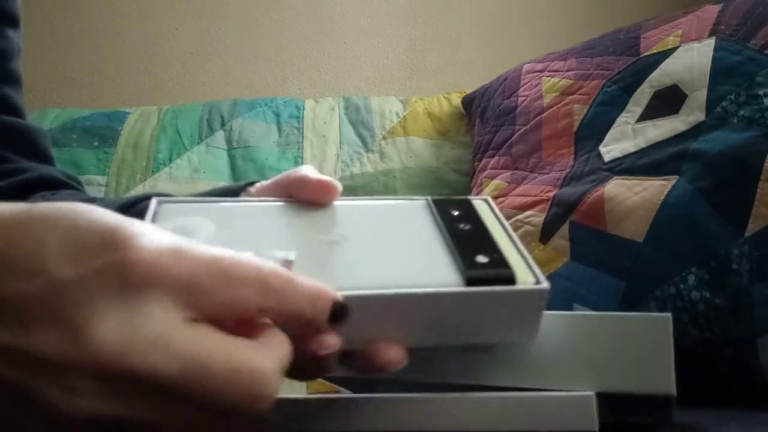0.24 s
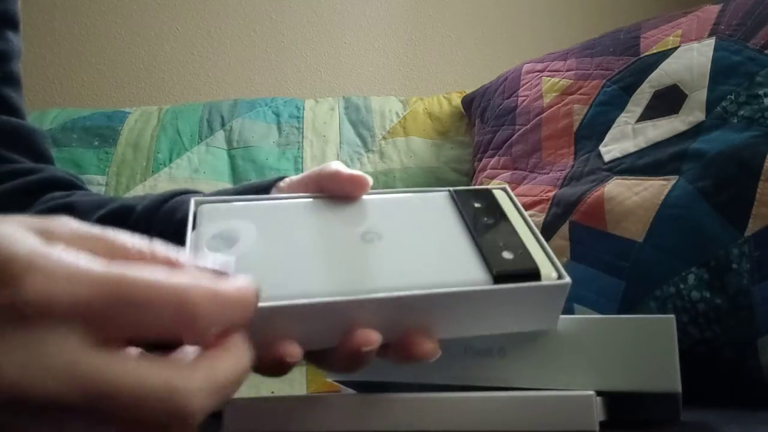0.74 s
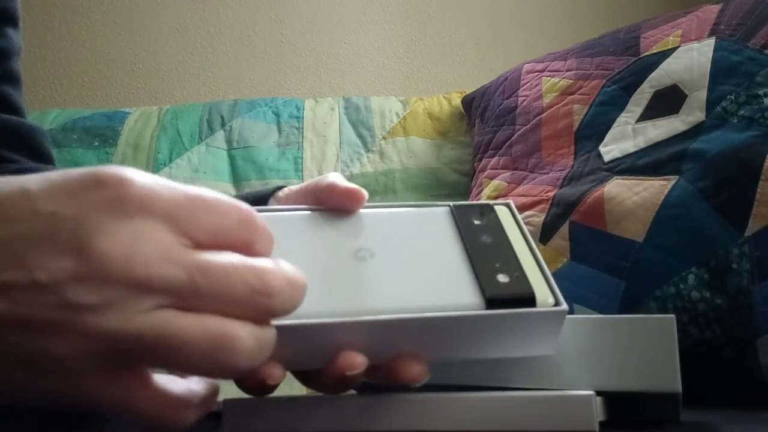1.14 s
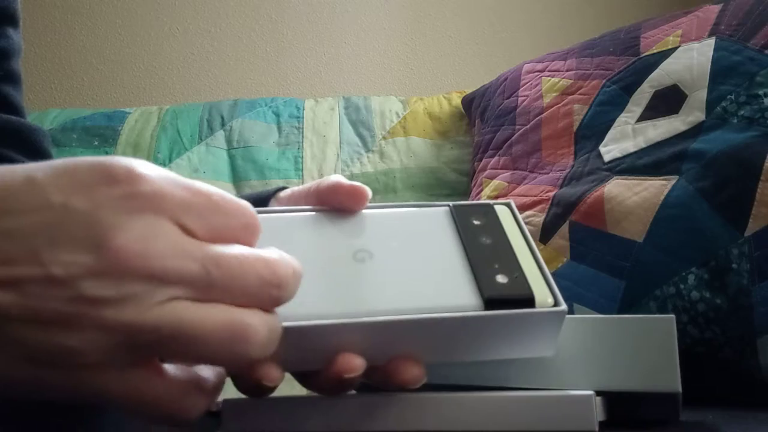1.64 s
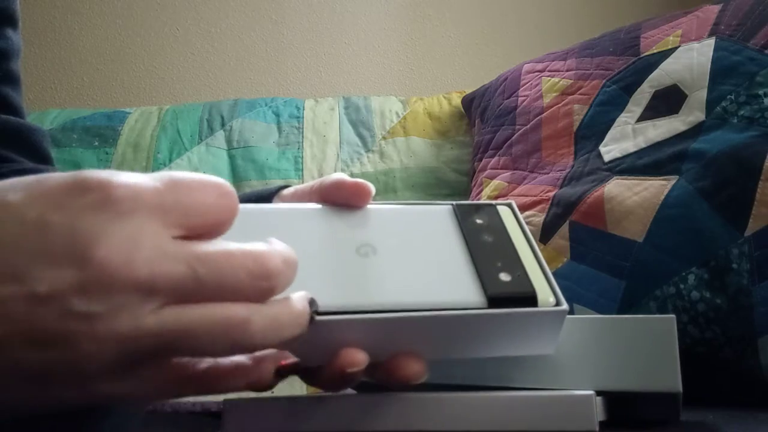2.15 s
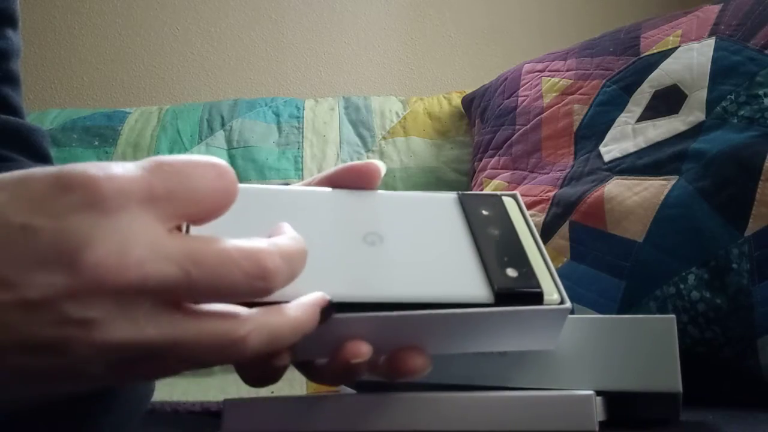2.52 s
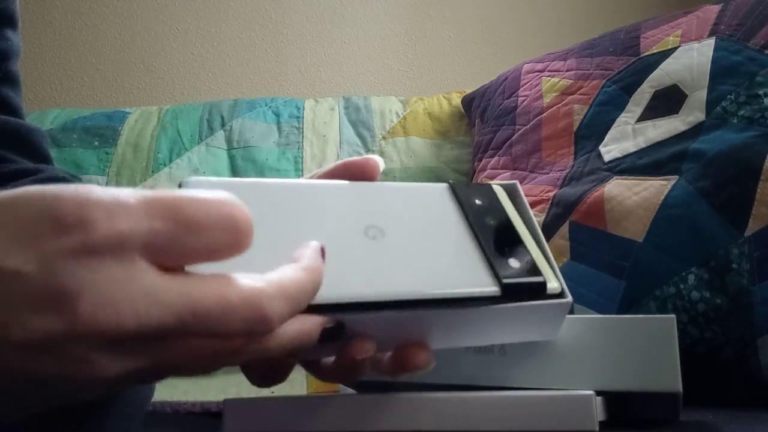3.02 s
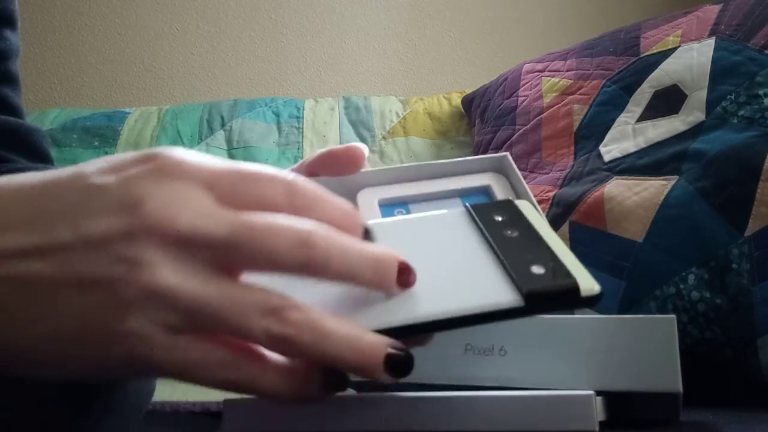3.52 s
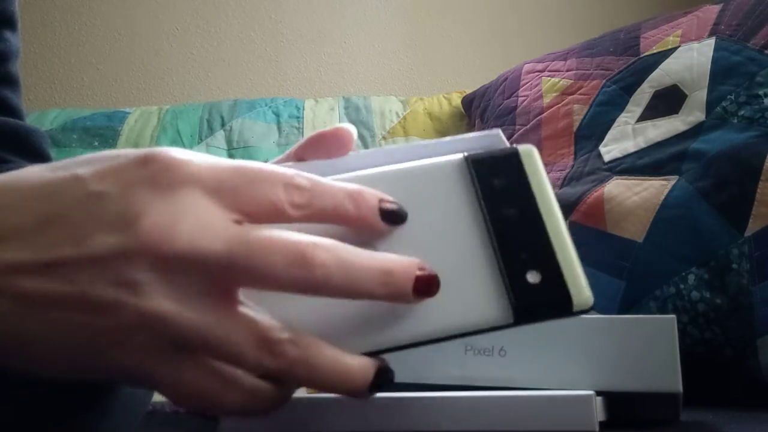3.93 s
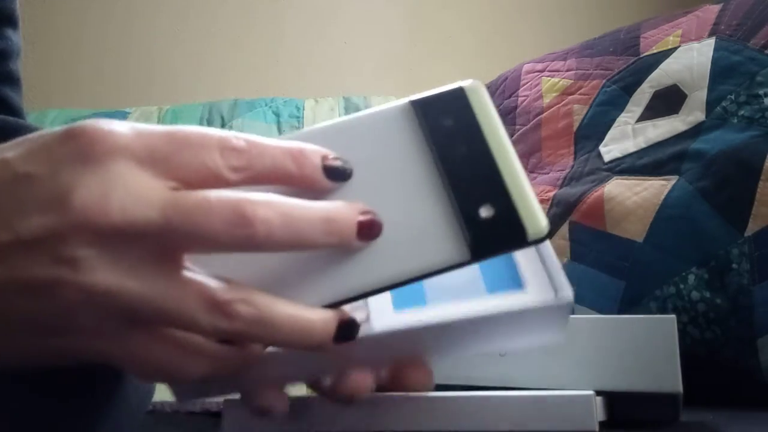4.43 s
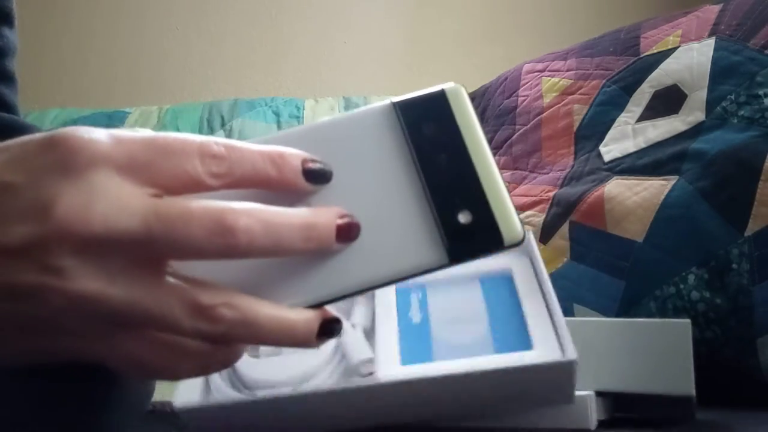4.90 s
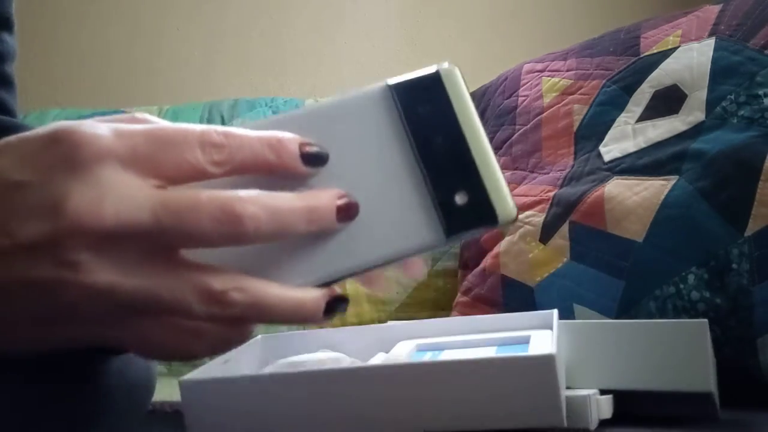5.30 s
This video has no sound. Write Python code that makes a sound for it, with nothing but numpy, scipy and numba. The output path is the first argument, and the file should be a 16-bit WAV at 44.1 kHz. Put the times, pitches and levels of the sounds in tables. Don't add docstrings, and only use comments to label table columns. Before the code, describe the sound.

A quiet, cushioned room with faint hiss, low hum and hardly any reverberation; handling is very close, stronger in the left channel. From 0 to 0.6 s fingers rub a small hollow cardboard box, with papery hiss, nail taps around 0.2 s and soft drumming thuds. From 0.65 to 2 s it is nearly quiet, with tiny creeps and faint flicks. From 2 to 2.9 s short, smooth, woody scuffs and light taps come and go. At 3.1 s a sharp loud click, then a rough drag at 3.2-3.45 s with rattling knocks, hardest near 3.4 s, as the phone comes free. Light brushes follow; at 4 s a very short, rubbery squeak. Quiet until 4.7 s, then a faint wavering creak, bright little ticks near 4.9 s, and a clicking, scuffing landing at 4.97 s. Soft rubbing fades, then a cluster of crisp ticks and hollow thumps at 5.3-5.36 s, a smooth slide, and stillness by 5.5 s.

```python
import sys
import numpy as np
from scipy import signal
from scipy.fft import rfft, irfft
from scipy.io import wavfile
from scipy.ndimage import uniform_filter1d
from numba import njit

SR = 44100
rng = np.random.default_rng(int(sys.argv[2]) if len(sys.argv) > 2 else 0)


def volts(x):
    e = np.asarray(x, float) / 20
    return 10 ** e


def unload_wav(signal):
    wavfile.write(
        sys.argv[1],
        SR,
        np.round(np.clip(np.atleast_2d(signal).T, -1, 1) * 32767).astype(np.int16),
    )


N = 245195
HZ = np.arange(N // 2 + 1) * SR / N
TIME = np.arange(N) / SR
QUIET_TOP_HZ = 15900


def unit(x):
    return x / np.sqrt(np.mean(x ** 2))


def over_hz(table):
    hz, value = np.transpose(table)
    return np.interp(np.log(HZ + 1), np.log(hz + 1), value)


def over_time(table):
    s, *columns = np.transpose(table)
    return [np.interp(TIME, s, column) for column in columns]


@njit
def svf(x, hz, q):
    y, band, low = np.empty(len(x)), 0., 0.
    for i in range(len(x)):
        g = np.tan(np.pi * hz[i] / SR)
        v = (band + g * (x[i] - low)) / (1 + g * (g + 1 / q))
        band, low = 2 * v - band, low + 2 * g * v
        y[i] = v / q
    return y


def resonate(x, modes):
    power = 0
    for hz, width, db in modes:
        detuning = (HZ - hz ** 2 / (HZ + 1)) / width
        power = power + volts(db) ** 2 / (1 + detuning ** 2) ** 2
    return unit(irfft(rfft(x) * np.sqrt(power) * (HZ < QUIET_TOP_HZ), N))


def walk(rate):
    k = int(SR / rate)
    held = np.repeat(rng.standard_normal(N // k + 1), k)
    return unit(uniform_filter1d(held, k)[:N])


def fibres(rate, scatter_db, flutter_db, smooth):
    size = volts(np.minimum(scatter_db * rng.exponential(1, N), 13))
    clicks = (rng.random(N) < rate / SR) * size * rng.standard_normal(N)
    return (unit(clicks) + smooth * rng.standard_normal(N)) * volts(flutter_db * walk(60))


def ring(t, hz, t60, phase=0):
    return np.sin(2 * np.pi * hz * t + phase) * np.exp(-np.log(1000) * t / max(t60, .001))


def add(track, s, sound):
    i = int(s * SR)
    track[i:i + len(sound)] += sound[:N - i]


def tone(table, db):
    # f/Hz, correlation [0-1]
    likeness = [(25, .97), (60, .9), (130, .55), (290, .2), (640, 0), (1400, .4), (3000, 0)]
    # f/Hz, left minus right level/dB
    balance = [(60, 2.5), (110, -9), (200, -1), (380, 1.5), (700, 5), (1290, 6.5), (2380, 4.5), (4400, 6.5),
               (8120, 10.5), (15000, 14)]
    alike, lean = over_hz(likeness), over_hz(balance)
    mid, side = rfft(rng.standard_normal((2, N)))
    pair = np.array([np.sqrt(1 + alike) * mid + s * np.sqrt(1 - alike) * side for s in (1, -1)])
    colour = volts(over_hz(table) + np.array([lean, -lean]) / 2)
    noise = irfft(pair * colour * (HZ < QUIET_TOP_HZ), N)
    return noise / np.sqrt(np.mean(noise.mean(axis=0) ** 2)) * volts(db)


def air():
    # f/Hz, density level/dB per Hz
    room_tone = [(12, -0.5), (30, -15.5), (64, -11.5), (90, -20), (120, -18), (200, -19), (350, -19),
                 (600, -25.5), (1000, -29), (1500, -35.5), (2400, -46), (4000, -79)]
    # f/Hz, density level/dB per Hz
    mic_hiss = [(1060, -40), (1800, -7.5), (2410, -1), (2620, -5.5), (3050, -1.5), (4050, -1.5), (5040, -6),
                (5520, -1.5), (7880, -8), (8320, -8.5), (9810, -8), (14300, -9), (15900, -9)]
    # f/Hz, level/dB
    hums = [(59.5, -72.5), (119, -83.5), (200, -72), (276, -80.5)]
    hum = np.zeros(N)
    for hz, db in hums:
        level = volts(db + 2.5 * walk(7))
        hum += level * np.sin(2 * np.pi * np.cumsum(hz + 1.5 * walk(6)) / SR)
    return tone(room_tone, -64.5) + tone(mic_hiss, -81.5) + hum


def layers(rub_db, dry_db, scratch_db, gloss_db):
    scratch_share = 0.76
    over_rub = np.array([0 * dry_db, scratch_db + scratch_share * dry_db, dry_db, dry_db + gloss_db])
    return volts(rub_db + over_rub) ** 2


def contact():
    # t/s, pressure as rub level/dB, dryness as hiss over rub level/dB
    hand_leaves = [
        (0, -74.5, -3),
        (0.07, -68.5, -5),
        (0.12, -60.5, -8),
        (0.16, -59.5, -10),
        (0.22, -54, -13),
        (0.27, -62, -8.5),
        (0.35, -66.5, -3),
        (0.4, -66.5, -5.5),
        (0.43, -65, -14),
    ]
    hand_returns = [
        (0.43, -69.5, -9),
        (0.49, -61, -15),
        (0.54, -61, -11),
        (0.6, -63.5, -11),
        (0.625, -70, -15),
    ]
    slab_lifts = [
        (3.112, -61.5, -17),
        (3.19, -58, -15.5),
        (3.222, -54.5, -6.5),
        (3.265, -47.5, -5),
        (3.3, -54, -6),
        (3.35, -59, -4.5),
        (3.395, -50, -2),
        (3.425, -46, -9.5),
        (3.458, -74, -2),
    ]
    box_lowers = [
        (4.63, -83, -14),
        (4.7, -69, -4.5),
        (4.84, -67.5, -1.5),
        (4.9, -62.5, -4),
        (4.945, -60, -7),
        (4.96, -54, 2),
        (5.0, -54.5, -5),
        (5.03, -63, 1),
        (5.08, -66, -1),
    ]
    box_settles = [
        (5.08, -65, -1.5),
        (5.16, -68, -5),
        (5.25, -66, -9.5),
        (5.32, -61.5, -5.5),
        (5.365, -52.5, -16),
        (5.41, -56, -25),
        (5.45, -93, 1),
        (5.5, -82, -10.5),
    ]
    # t/s, length/s, rub level/dB, dryness level/dB, contact f/Hz
    scuffs = [(0.752, 0.067, -69, -13, 1200), (1.32, 0.094, -78, -32, 1010), (1.46, 0.035, -72, -16, 1010),
              (1.645, 0.051, -73.5, -21, 1650), (1.794, 0.035, -71, -30, 1660), (1.8, 0.082, -66, -10, 796),
              (1.86, 0.064, -76, -4, 1630), (2.082, 0.043, -64, -12.5, 1000),
              (2.109, 0.064, -58, -21, 1010), (2.181, 0.056, -65.5, -26, 1000),
              (2.243, 0.055, -56.5, -27, 1035), (2.294, 0.11, -66.5, -33, 1100),
              (2.4, 0.023, -71, -27, 1100), (2.502, 0.055, -58.5, -28, 1155), (2.557, 0.05, -63, -40, 1100),
              (2.652, 0.037, -80, -40, 1300), (2.745, 0.099, -63.5, -16.5, 1300),
              (2.823, 0.08, -61, -16, 1245), (2.957, 0.086, -71, 1.5, 1500), (3.542, 0.042, -76, -9, 1203),
              (3.616, 0.031, -77, -13, 1200), (3.759, 0.1, -70.5, -9.5, 1510),
              (3.983, 0.049, -53.5, -10.5, 990), (4.04, 0.064, -83, -6, 1300)]
    # t/s, length/s, rub level/dB, dryness level/dB
    creeps = [
        (0.651, 0.06, -74.5, -5),
        (0.858, 0.094, -70, -15),
        (1.073, 0.025, -75.5, -19),
        (1.124, 0.037, -73, -22),
    ]
    # course, contact f/Hz, scratch level/dB, gloss against paper hiss level/dB
    slides = [
        (hand_leaves, 1250, 0.8, -8),
        (hand_returns, 1300, 2.1, -6),
        (slab_lifts, 1400, -2.5, -14),
        (box_lowers, 890, 0.207, -2.5),
        (box_settles, 1000, 2, -7.5),
    ]
    power, hz = np.zeros((4, N)), np.full(N, 1200.)
    for course, slide_hz, scratch_db, gloss_db in slides:
        moving = (TIME >= course[0][0]) & (TIME < course[-1][0])
        power += moving * layers(*over_time(course), scratch_db, gloss_db)
        hz[moving] = slide_hz
    creep_hz = 2460
    short_slides = [tuple(e) for e in scuffs] + [tuple(e) + (creep_hz,) for e in creeps]
    for s, length, rub_db, dry_db, scuff_hz in short_slides:
        i, n = int((s - .012) * SR), int((length + 0.028) * SR)
        swell = signal.windows.tukey(n, .75) ** 2
        power[:, i:i + n] += layers(rub_db, dry_db, -0.5, -12)[:, None] * swell
        hz[i:i + n] = scuff_hz
    return np.sqrt(power), uniform_filter1d(hz, size=300)


def rubbing(gain, hz):
    # f/Hz, width/Hz, level/dB
    board_modes = [(570, 190, -5), (870, 400, -3), (1100, 310, -2.5), (1460, 660, -4.5), (2100, 280, -13)]
    scratch_modes = [(2500, 860, -1), (3200, 1000, -0.5), (4080, 1100, -3)]
    paper_modes = [(5650, 820, 3.5), (7540, 920, 0.5), (9650, 1200, -2.5)]
    gloss_modes = [(11770, 1600, 1), (14500, 1600, 0)]
    drag = fibres(1200, 1.4, 2.2, 1.29)
    hz = hz * (1 + .035 * walk(25))
    spot = svf(svf(drag, hz, 4.7), hz, 4.7)
    rub = unit(resonate(drag, board_modes) + volts(-7.0) * unit(spot))
    scratch = resonate(1.5 * drag + fibres(1200, 2.5, 1.7, 1.0), scratch_modes)
    ridge_hz = np.minimum(2.95 * hz, 4300) * (1 + .05 * walk(14))
    scratch = unit(scratch + 0.35 * svf(scratch, ridge_hz, 5.))
    nap = fibres(2500, 2.2, 2.0, 1.5)
    paper = np.zeros(N)
    for f, width, db in paper_modes:
        patches = volts(db + 2.3 * walk(18))
        paper += patches * resonate(nap, [(f, width, 0)])
    gloss = resonate(nap, gloss_modes)
    return gain[0] * rub + gain[1] * scratch + gain[2] * unit(paper) + gain[3] * gloss


def drumming(rub_gain):
    share, lag_s, rest_db, drum_db = 0.7, 0.17, -71, -64.5
    load = uniform_filter1d((rub_gain / volts(-58.5)) ** share, int(lag_s * SR))
    box_modes = [(120, 112, 9.5), (287, 200, -3.0), (358, 170, 0.0)]
    drum = resonate(fibres(200, 3.5, 2.7, 0.51), box_modes)
    return np.hypot(volts(rest_db), volts(drum_db) * load) * drum


def seat_jolts():
    # t/s, half length/s, level/dB
    shifts = [
        (0.0, 0.076, -59),
        (0.29, 0.073, -50.5),
        (3.45, 0.14, -67.5),
        (5.05, 0.11, -50.5),
        (5.4, 0.041, -43),
    ]
    jolt = resonate(rng.standard_normal(N), [(26.03, 26, 0)])
    shoves = sum(volts(db) * np.exp(-((TIME - s) / half) ** 2) for s, half, db in shifts)
    return (volts(-74) + shoves) * jolt


def strike(events, body_db, t60):
    # f/Hz, level/dB, t60/s
    body_modes = [(124, -4, 0.056), (286.3, 2, 0.04), (359, -4.5, 0.055), (581, -7.5, 0.054),
                  (861, 1.5, .03)]
    out, t = np.zeros(N), np.arange(4000) / SR
    edge = t[:30]
    crack_ring = np.hanning(len(edge)) * np.sin(2 * np.pi * 2300 * edge)
    for s, db, hz, crack_db in events:
        c = rng.standard_normal(216)
        knock = ring(t, hz, t60)
        knock += .5 * ring(t, hz * (1.33 + 0.16 * c[0]), 0.83 * t60)
        knock += 0.077 * ring(t, hz * (.7 + 0.036 * c[1]), 1.36 * t60)
        knock *= np.minimum(t * hz / 0.72, 1) ** 2
        body = np.zeros(len(t))
        for k, (f, g, decay) in enumerate(body_modes):
            body += volts(g + 2.2 * c[2 + k]) * ring(t, f * (1 + 0.053 * c[8 + k]), decay)
        body *= 1 - np.exp(-t / 0.0041)
        splits = (0.55 * c[16:] + (t[:200] == 0) * 4) * np.exp(-t[:200] / 0.0009)
        crack = np.convolve(splits, crack_ring)
        add(out, s + 0.000786, volts(db) * (knock / np.abs(knock).max() + volts(body_db + 2.5) * body))
        add(out, s + 0.00121, volts(db + crack_db + 1.0) * crack / np.abs(crack).max())
    return out


def rim_taps():
    # t/s, peak level/dB, ring f/Hz, crack level/dB
    nails = [
        (0.033, -38.5, 1070, -2),
        (0.069, -42.5, 900, -22),
        (0.198, -28, 507, 0.5),
        (1.421, -62.5, 886, 5.5),
        (2.062, -34.5, 1147, -2),
        (3.102, -22, 1700, -25.5),
        (3.393, -26.5, 1812, -4.5),
        (5.331, -36.5, 1500, -20.5),
        (4.9245, -26, 887, -40.5),
    ]
    return strike(nails, -38.5, 0.0072)


def plucks():
    # t/s, peak level/dB, ring f/Hz, crack level/dB
    flaps = [
        (0.054, -38, 486, -16),
        (1.654, -57.5, 619, -24),
        (1.83, -41, 800, -13),
        (2.131, -42.5, 577, -14.5),
        (2.52, -47, 1270, -17),
    ]
    return strike(flaps, -30, 0.024)


def bursts(events):
    out = np.zeros(N)
    for s, length, db, hz, width in events:
        n = int((length + 0.0071) * SR)
        c = rng.standard_normal((2, n + 400))
        clumps = uniform_filter1d(c[1], size=40)
        catches = c[0] * volts(3.4 * np.abs(c[1]) + 13.0 * clumps)
        centre = np.full(n + 400, 1. * hz)
        sound = unit(svf(svf(catches, centre, hz / width), centre, hz / width)[400:])
        age = np.arange(n) / n
        add(out, s - .003, volts(db) * sound * np.clip(np.minimum(age / 0.16, (1 - age) / 0.38), 0, 1))
    return out


def brushes():
    # t/s, length/s, level/dB, f/Hz, width/Hz
    passes = [(0.065, 0.09, -70.5, 9500, 3300), (0.34, 0.064, -74, 10000, 4000),
              (0.197, 0.013, -63, 6000, 4100), (0.515, 0.0074, -65.5, 5200, 4000),
              (0.2, 0.016, -47, 1500, 800), (1.07, .04, -79, 1900, 760), (1.13, 0.037, -75.5, 1900, 1000),
              (1.8, 0.032, -78, 4140, 700), (2.655, 0.044, -74.5, 1320, 260),
              (2.755, .15, -68.5, 1380, 280), (2.78, 0.13, -79, 7950, 500),
              (2.965, 0.082, -68.5, 2900, 1700), (2.97, 0.074, -68.5, 7540, 1000),
              (3.2, 0.074, -66.5, 13000, 5000), (3.265, 0.095, -62.5, 8200, 2100),
              (3.392, .03, -56, 12000, 6000), (3.44, 0.067, -76.5, 5970, 2500),
              (3.49, 0.077, -80, 12600, 6800), (3.76, .1, -76.5, 4000, 600), (3.76, .1, -75, 2400, 550),
              (3.6, 0.078, -73.5, 1320, 200), (5.35, 0.037, -46.5, 120, 68), (4.2, .02, -61, 250, 180),
              (5.44, 0.048, -52.5, 38, 40), (4.95, .02, -52, 780, 700), (3.76, .1, -77.5, 11800, 1800),
              (1.81, 0.12, -78, 13100, 5800), (2.088, .035, -73, 6100, 2800), (4.66, .1, -77.5, 3800, 3700)]
    return bursts(passes)


def chatters():
    # t/s, length/s, level/dB, f/Hz, width/Hz
    catches = [(0.111, .06, -66, 1410, 500), (0.094, 0.076, -70, 3260, 500),
               (0.172, 0.15, -64.5, 2680, 400), (0.503, 0.13, -67.5, 2610, 500),
               (1.653, 0.01, -69, 1640, 250), (1.68, 0.035, -77, 1650, 250), (1.778, 0.032, -73, 1650, 300),
               (1.8, 0.087, -62, 860, 300), (1.845, 0.04, -76, 3200, 500), (3.196, 0.022, -52, 1350, 400),
               (3.22, 0.04, -45.5, 1460, 400), (3.222, 0.037, -53, 4150, 400),
               (3.222, 0.013, -60, 7720, 500), (3.272, 0.013, -41.5, 1400, 702),
               (3.33, 0.062, -64, 5610, 401), (3.34, 0.01, -57.5, 3950, 500),
               (3.366, 0.013, -47, 1154, 600), (3.367, 0.0097, -50, 3900, 700),
               (3.392, .028, -53, 5800, 500), (3.42, .012, -45, 1410, 796), (4.023, 0.017, -61, 1335, 199),
               (4.721, .03, -74, 1310, 400), (4.974, 0.029, -55.5, 290, 150), (4.979, 0.02, -46, 950, 400),
               (5.002, 0.051, -63, 3150, 600), (5.27, 0.039, -67, 2740, 400),
               (3.257, 0.0241, -48.5, 330, 200), (5.348, 0.02, -41, 269, 150),
               (2.126, 0.038, -63.5, 2150, 400), (2.268, .015, -63, 2030, 500),
               (2.526, 0.018, -66, 2100, 600), (2.585, .015, -77, 3200, 600)]
    return bursts(catches)


def thumps():
    # t/s, peak level/dB, ring f/Hz, crack level/dB
    blows = [(0.168, -36.5, 865, -39), (0.205, -30, 796, -48), (0.296, -47.5, 900, -35),
             (0.467, -38, 580, -40), (0.516, -32, 977, -14), (0.542, -45, 935, -40),
             (0.998, -55.5, 603, -10), (1.486, -47.5, 545, -11), (1.969, -57.5, 890, -7),
             (2.02, -54.5, 940, -29), (3.26, -24.5, 577, -15.5), (3.317, -40, 1460, -39.5),
             (4.961, -40.5, 840, -18.5), (4.982, -30, 748, -18), (4.993, -36, 974, -26.5),
             (5.127, -37, 380, -11), (5.204, -49.5, 552, -21), (5.347, -25, 485, -2),
             (5.355, -21, 640, -16.5), (5.361, -29.5, 485, -33)]
    return strike(blows, -6.5, 0.01)


def small_knocks():
    # t/s, peak level/dB, ring f/Hz, crack level/dB
    knocks = [(3.204, -38.5, 1420, -8), (3.261, -22, 1340, -19), (3.266, -29.5, 1510, -19),
              (3.278, -34.5, 833, -22.5), (3.281, -32, 1550, -35), (3.368, -37.5, 1163, -17.5),
              (3.403, -15.5, 1431, -9.5), (3.417, -24, 1430, -7.5), (3.422, -31, 1380, -15.5),
              (3.7565, -44.5, 1700, -9), (4.967, -32, 822, -9.5), (3.226, -39, 1340, -25),
              (3.231, -37, 1530, -25), (3.244, -38.5, 1450, -24.5), (3.249, -38, 1410, -25.5),
              (3.374, -38, 900, -12), (1.82, -46.5, 700, -25), (2.149, -52, 1000, -13),
              (2.261, -48, 1000, -25), (2.272, -49, 1040, -15), (2.507, -54, 1120, -25),
              (2.541, -51, 1040, -20), (2.571, -50, 1030, -25), (2.593, -50.5, 1070, -25)]
    return strike(knocks, -24, .013)


def ticks():
    # t/s, peak level/dB, brightest f/Hz, edge fullness level/dB
    releases = [(1.83, -58, 9000, -20), (2.0611, -46.5, 7200, -6), (3.907, -62, 13000, -25),
                (3.915, -62, 12500, -25), (4.862, -51.5, 12000, -25), (4.873, -45.5, 12000, -25.5),
                (4.881, -45.5, 13000, -25.5), (3.0612, -53, 5800, -5.5), (3.1023, -11.5, 9400, -10.5),
                (3.1137, -46.5, 9500, -9), (3.124, -53, 9650, 0), (3.5963, -56.5, 7540, -7.5),
                (3.686, -57.5, 7330, -16), (3.756, -52, 11800, 9), (4.055, -49, 11500, -8.5),
                (4.866, -47.5, 11700, -25), (4.8686, -44.5, 11700, -25), (4.8751, -40, 13000, -25.5),
                (4.8825, -42.5, 5230, -13), (4.915, -35.5, 11500, -25), (4.954, -38, 11800, -8),
                (4.9691, -15.5, 8060, -28.5), (5.2814, -51, 12500, -7), (5.295, -38, 12400, -9),
                (5.3233, -26, 13900, -21.5), (5.3312, -25, 7170, -15.5), (5.346, -17, 7630, -9),
                (5.354, -22.5, 8740, -13), (5.3585, -34.5, 7510, -11.5)]
    t60, q, echo_s, echo_db = 0.0044, 1.1, .0017, -12.5
    out, t = np.zeros(N), np.arange(300) / SR
    edge = ring(t, 1800, 0.002, 2.19) + 0.7 * ring(t, 1900, 0.0064)
    for s, db, hz, edge_db in releases:
        decaying = rng.standard_normal(300) * np.exp(-np.log(1000) * t / t60)
        bright = 1.1 * svf(decaying, np.full(len(t), 1. * hz), q)
        bright += 0.91 * ring(t, hz, 0.5 * t60)
        bright += 0.61 * ring(t, 0.857 * hz, 0.33 * t60)
        bright += 0.64 * ring(t, 0.67 * hz, 0.00074)
        tick = volts(db) * (bright / np.abs(bright).max() + volts(edge_db) * edge)
        add(out, s + 0.00101, tick)
        add(out, s + 0.00101 + echo_s, volts(echo_db) * uniform_filter1d(tick, size=2))
    return out


def squeak():
    # t/s, slip rate f/Hz, level/dB
    slips = [
        (3.975, 644, -96.5),
        (3.983, 639.4, -34),
        (3.998, 644, -30),
        (4.006, 639, -33.5),
        (4.013, 672, -30),
        (4.024, 660, -51.5),
        (4.05, 656, -77.5),
    ]
    orders = [(1, -11), (2, -1), (3, -1), (4, -15), (5, -15.5), (6, -24), (7, -41), (8, -32)]
    grabs_s, double_slip_db_per_s = 3.995, 601
    lets_go_s, slack_db_per_s = 4.004, 2401
    dulling = 3
    hz, db = over_time(slips)
    phase = 2 * np.pi * np.cumsum(hz * (1 + 0.022 * walk(900))) / SR
    weak = db - db.max() - np.clip(slack_db_per_s * (TIME - lets_go_s), 0, 22)
    split_db = np.clip(double_slip_db_per_s * (grabs_s - TIME), 0, 8)
    voice = np.zeros(N)
    for k, g in orders:
        order_db = g + dulling * weak * np.log(k) / 2 - k % 2 * split_db
        voice += volts(order_db) * np.sin(k * phase)
    return volts(db + 0.84 * walk(500)) * voice * (db > -74)


def creak():
    # t/s, f/Hz, level/dB
    bends = [
        (4.73, 200, -80),
        (4.75, 232.7, -58),
        (4.79, 242, -59),
        (4.82, 197.7, -61),
        (4.85, 199, -76),
        (4.87, 237.8, -56),
        (4.91, 336.8, -56.5),
        (4.99, 298, -52),
        (5.02, 259.5, -76.5),
    ]
    hz, db = over_time(bends)
    phase = 2 * np.pi * np.cumsum(hz * (1 + 0.018 * walk(80))) / SR
    return volts(db + 2.0 * walk(50)) * (np.sin(phase) + 0.15 * np.sin(2 * phase)) * (db > -74)


def room(x, t60=0.22, wet_db=-23):
    t = np.arange(int(.3 * SR)) / SR
    tail = rng.standard_normal((2, len(t))) * np.exp(-np.log(1000) * t / t60) * (t > .004)
    tail = signal.lfilter([1], [1, -.75], tail)
    tail = tail / np.sqrt((tail ** 2).sum() / 2)
    return volts(wet_db) * signal.fftconvolve(x[None], tail, axes=1)[:, :N]


def ports(hits, rub, far_rub):
    # f/Hz, left minus right level/dB
    shading = [(60, 3), (250, 3), (600, 12.5), (1300, 8), (2400, 10), (4400, 9), (8000, 14.5),
               (15000, 10.5)]
    # f/Hz, phase lead of the far port [rad]
    lead = [(30, 0.8), (70, 0.57), (300, 1.2), (750, 1.27), (1400, -0.5), (3000, -1.75), (8000, -1.3),
            (16000, -4.5)]
    # f/Hz, share reaching the far port by detours [0-1]
    scatter = [(100, .1), (700, .05), (1500, .15), (2200, .55), (9000, .55)]
    shade, share = volts(-over_hz(shading)), over_hz(scatter)
    direct = shade * np.sqrt(1 - share) * np.exp(1j * over_hz(lead))
    detour = rfft(rng.standard_normal(200) * np.exp(-np.arange(200) / 50), N) / 5
    near = rfft(hits + rub)
    far = direct * near + shade * np.sqrt(share) * (detour * rfft(hits) + rfft(far_rub))
    return irfft(np.array([near, far]) * 2 / np.sqrt(1 + shade ** 2 + 2 * direct.real), N)


def scene():
    gain, hz = contact()
    taps = rim_taps() + plucks() + thumps() + small_knocks()
    hits = drumming(gain[0]) + taps + ticks() + squeak() + creak()
    rub, far_rub = rubbing(gain, hz), rubbing(gain, hz)
    tail = room(hits + rub) * volts(np.array([[3.5], [-3.5]]))
    jolt = seat_jolts() * volts(np.array([[1.2], [-1.2]]))
    return ports(hits + brushes() + chatters(), rub, far_rub) + tail + jolt + air()


def low_pass(x):
    return signal.sosfilt(signal.butter(12, 17150, fs=SR, output="sos"), x)


def record(dry):
    roll = 1 / (1 + (HZ / 16100) ** 40) * (HZ < 17150)
    mix = irfft(rfft(dry) * roll, N)
    return low_pass(mix)


dry = scene()
out = record(dry)
unload_wav(out)
```